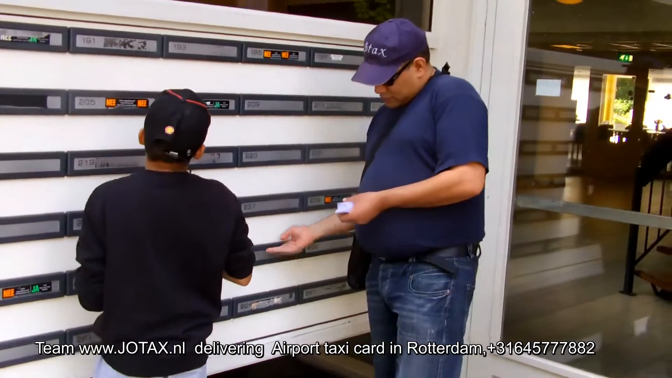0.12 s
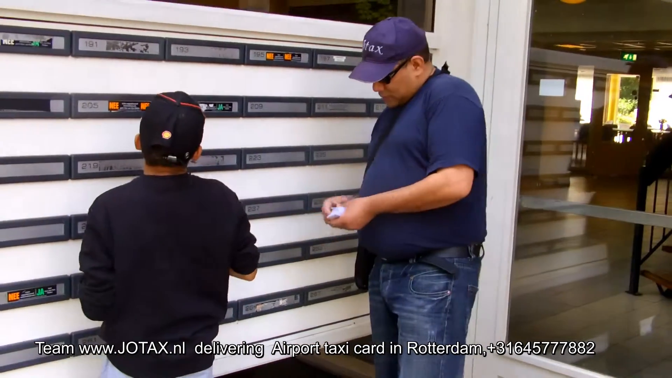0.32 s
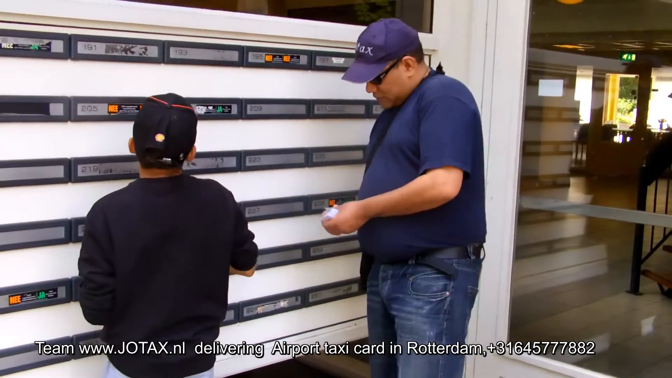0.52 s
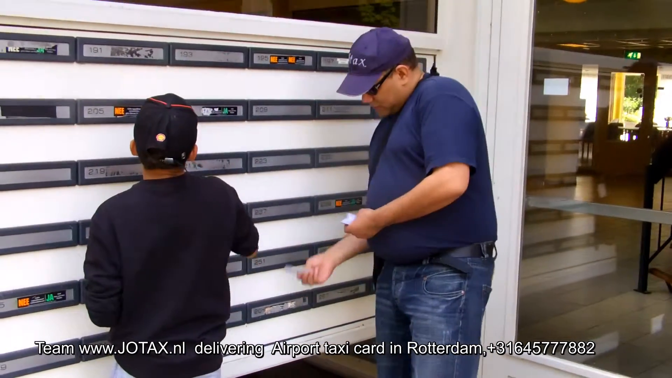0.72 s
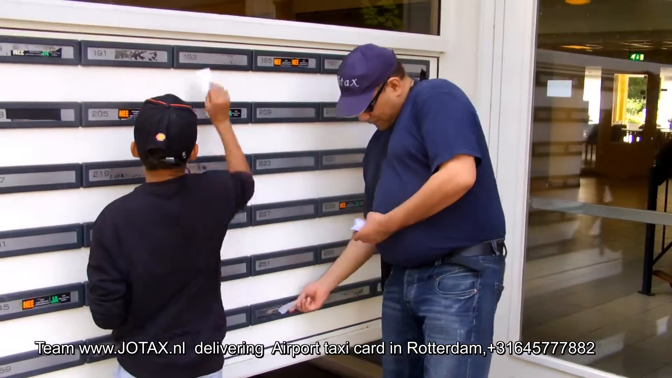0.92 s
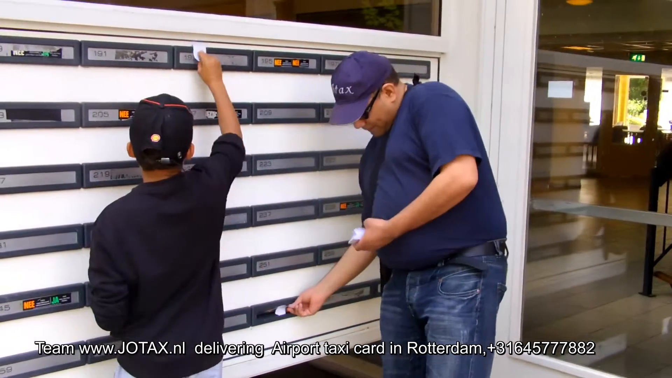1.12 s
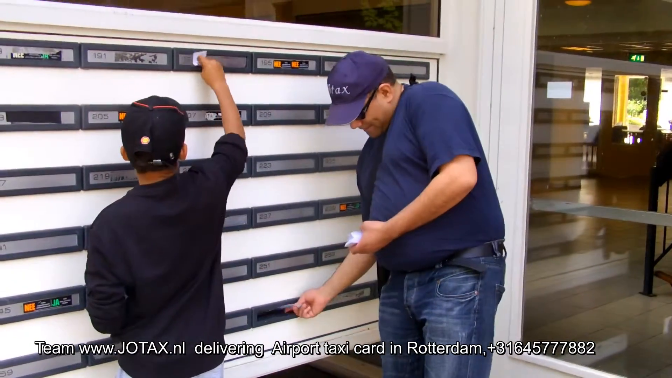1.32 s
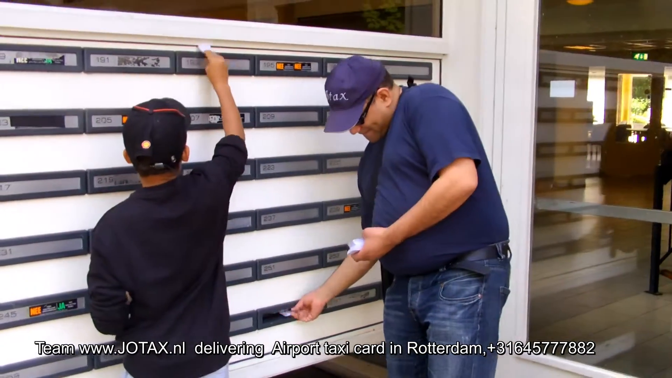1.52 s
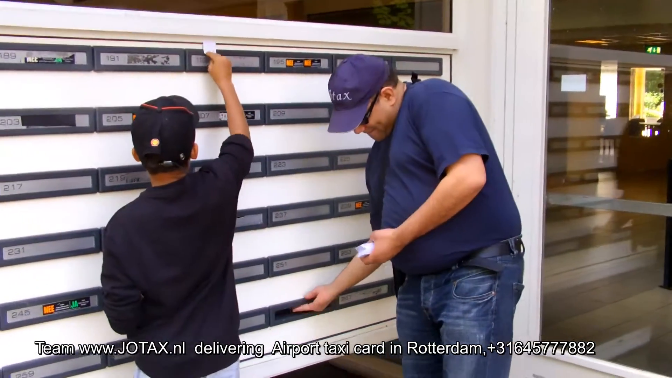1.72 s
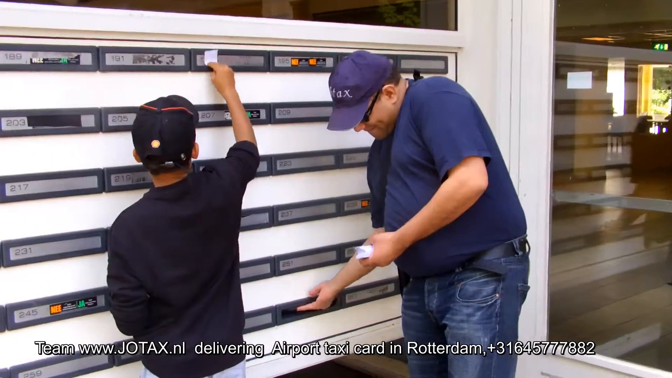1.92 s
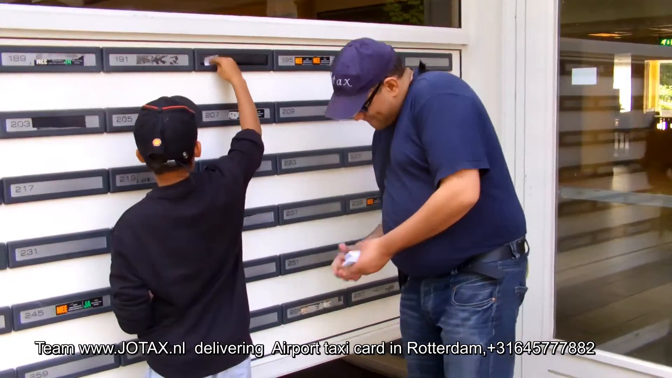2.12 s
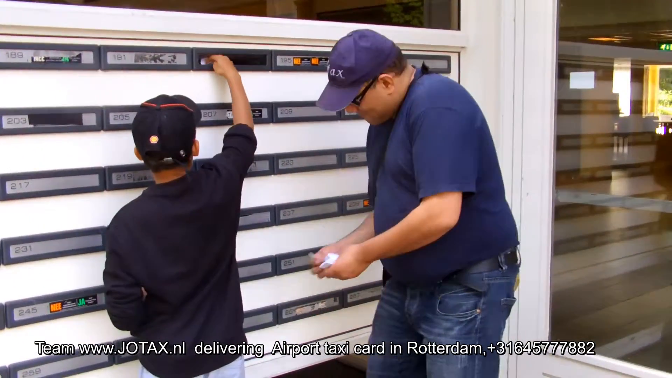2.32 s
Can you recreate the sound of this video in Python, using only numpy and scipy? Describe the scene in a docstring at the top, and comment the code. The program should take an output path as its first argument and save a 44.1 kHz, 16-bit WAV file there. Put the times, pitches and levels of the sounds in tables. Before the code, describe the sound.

Metal mailbox flaps clack shut four times, with cards scuffing through the slots between.

```python
"""An entrance hall, a stereo microphone one step from a wall of mailboxes. Distant traffic and a faint
fan hum lie under it all. Cards scuff in a slot; at 0.2 s a low sprung metal flap snaps shut and bounces
on its frame, then a high one at 0.56 s. Each blow chatters for a few ms and rings the flap and the box
behind it, and the hall answers softly. More cards scuff and lifted flaps clink, until another high flap
slams at 1.5 s and another low one at 2.0 s."""
import sys
import numpy as np
from scipy import signal
from scipy.fft import rfft, irfft
from scipy.io import wavfile
from scipy.ndimage import uniform_filter1d

SR = 44100
rng = np.random.default_rng(int(sys.argv[2]) if len(sys.argv) > 2 else 0)


def unload_wav(signal):
    """Save mono or channel-first audio to the path in sys.argv[1] as 16-bit WAV at rate SR, clipped to [-1, 1]."""
    wavfile.write(
        sys.argv[1],
        SR,
        np.round(np.clip(np.atleast_2d(signal).T, -1, 1) * 32767).astype(np.int16),
    )


N = 103635

# distant traffic, its mid spectrum and its side relative to the mid: f/Hz, level/dB
TRAFFIC_MID = [(18, -37.5), (30, -28.5), (221, -15.5), (287, -9.5), (404, -15), (437, -4), (473, -11.5),
               (760, -5), (1910, -15), (14800, -29), (16000, -40.5)]
TRAFFIC_SIDE = [(60, -33.5), (110, -18), (200, -22), (380, -15), (700, -15.5), (1290, -11.5), (2380, -8.5),
                (4400, -5.5), (8120, 2), (15000, 1)]
# partials of the fan: f/Hz, rms level/dB
FAN_PARTIALS = [(439, -72), (586, -74.5), (733, -77.5)]
# left over right at the microphone, for near sounds: f/Hz, level/dB
MIC_BALANCE = [(200, -1), (2400, 0.5), (4800, 0), (8000, -4), (12000, 6.5), (15000, 5.5)]
# phase by which the left port leads, before lead_scale: f/Hz, phase/rad
MIC_PHASE = [(3500, 0.046), (5500, 0.59), (8000, 0.77), (12000, 0.86), (16000, 1)]
# cards and fingers at the slots, and a light flap tap at 1.81 s: t/s, peak level/dB, centre f/Hz,
# width/octaves, rise/ms, t60/s
SLOT_SCUFFS = [(0.142, -37.5, 4830, 6.2, 0.59, 0.16), (0.182, -33.5, 1960, 1.7, 6.6, 0.53),
               (.655, -42, 7850, 1.4, 1.1, 0.25), (.7, -50.5, 7060, 0.61, 4.4, 0.15),
               (0.928, -40, 2470, 5.6, 7.1, 0.18), (0.994, -39.5, 3970, 5.6, 4.6, 0.12),
               (1.062, -46.5, 7500, 0.26, 1.4, 0.038), (1.115, -39.5, 8000, 0.46, 3, 0.038),
               (1.125, -32.5, 6000, 3.5, 0.99, 0.041), (1.145, -26.5, 6000, 2.06, 0.17, 0.082),
               (1.151, -40, 10000, 1.9, 0.17, 0.023), (1.1613, -33.5, 7860, 3.6, 0.66, 0.13),
               (1.185, -37.5, 5730, 5.2, 0.8, 0.072), (1.233, -46, 6500, 0.69, 5, 0.059),
               (1.2877, -42.5, 7900, 0.34, 3.2, 0.067), (1.306, -38, 9300, 2, 1.2, 0.21),
               (1.335, -39, 9250, 3.2, 24, 0.26), (1.3648, -41, 7000, 1.6, 0.86, 0.028),
               (1.3693, -26.5, 8050, 3.6, 0.89, 0.047), (1.3746, -23, 3700, 0.92, 0.38, 0.081),
               (1.3991, -33.5, 4300, 4.3, 0.52, 0.036), (1.66, -43, 5970, 2.4, 3.1, 0.22),
               (1.739, -46, 2020, 0.27, 3.8, 0.056), (1.623, -42.5, 4000, 2, 1, 0.13),
               (1.8113, -25.5, 7100, 1.22, .4, 0.14), (1.816, -33.5, 2040, 0.48, 0.32, 0.13),
               (1.8936, -37.5, 6160, 4.5, 1.2, 0.17), (1.942, -45, 5800, 2.4, 2.4, 0.033),
               (1.9467, -37, 2530, 1.8, 0.31, 0.18), (2.0, -33, 9000, 2.3, 37, .4),
               (2.2393, -45, 7000, 1.5, 1.7, 0.71), (2.335, -42.5, 12100, 0.5, 2.3, 0.12)]
# flaps being lifted: t/s, peak level/dB, t60/s
HINGE_CLINKS = [(1.0002, -53, 0.067), (1.126, -46, 0.11), (1.146, -48, 0.085), (1.3755, -41.5, 0.099),
                (1.948, -46, 0.085), (.933, -60.5, 0.039)]
# modes of the boxes behind the flaps: f/Hz, first box level/dB, second box level/dB, t60/s
LOW_BOX_MODES = [(234, -8, -2.5, 0.12), (282, -14.5, -15, 0.52), (636.7, 3, 1, 0.08),
                 (1030, -5.5, 3.5, 0.063), (1527, 2, 3, 0.07), (2065, 5.5, 7, 0.071), (140, -8, -12, .05)]
HIGH_BOX_MODES = [(217, -3.5, -2, 0.062), (281, -6, -12, 0.31), (640, 0, 5.5, 0.1), (806, -22, 2, 0.068),
                  (990, 6, -22, 0.098), (1343, 1, 4.5, 0.094), (1623, 8, 6.5, 0.053)]
# modes of the two low and two high flaps: f/Hz, first flap level/dB, second flap level/dB, t60/s
LOW_FLAP_MODES = [(3170, -6.5, -4.5, 0.16), (3402, -8, -9.5, 0.13), (3903, -4.5, -13, 0.11),
                  (4680, -6.5, -24, 0.11), (5190, -7.5, -14, .1), (5930, -10.5, -2.5, 0.13),
                  (6765, 5.5, -10, 0.076), (7360, 4, 1, 0.12), (7923, 6.5, 2.5, 0.09),
                  (9030, -4, 6.5, 0.083), (10595, 14, 11, 0.033), (11420, 6, -0.5, .1),
                  (12490, 4.5, 10, 0.037)]
HIGH_FLAP_MODES = [(2774, -12, -7.5, 0.26), (3090, -2, -4, 0.14), (3440, 2, -7, 0.15),
                   (3830, -14, -2.5, 0.08), (5050, -19, -1.5, 0.033), (5730, -6, 5, 0.033),
                   (6720, -1, -5.5, 0.071), (8820, 5, 8.5, 0.1), (10450, 0, 6, 0.069), (12380, 4, 9, 0.039),
                   (11850, 2.5, 5, 0.06)]
# spectrum of the plates' dense wash: f/Hz, relative level/dB
LOW_FLAP_WASH = [(59, -55), (100, -19.5), (239, -21.5), (461, -21), (621, -14), (1310, -12.5), (1580, -15),
                 (5650, -6.5), (10700, -1.5), (14700, -6.5), (16000, -31.5)]
HIGH_FLAP_WASH = [(59, -71), (100, -44), (260, -6), (442, -12.5), (648, -3), (1170, -7.5), (3250, -8),
                  (4020, -6), (11900, -2), (15000, -10), (16000, -30)]
# blows and bounces on the frames: t/s, peak level/dB, thud trim/dB, tail trim/dB, chatter/ms, wash t60/s
LOW_FLAP_BLOWS = [(.2024, 3.5, -34, -27.5, 1.8, 0.064), (.2048, -2.5, -36, -12, 1.2, .12),
                  (.2083, -4, -34.5, -17, 3.5, 0.076), (.2277, -20, -32.5, -24, .5, .1),
                  (.2374, -12.5, -42.5, -13, 5, .12), (.2415, -8, -37.5, -9, 4, 0.13),
                  (.264, -19, -28, -4, 3, .1), (.274, -37, -30, -11, 3, 0.071),
                  (2.0362, 3.5, -36, -20, 1.35, .14), (2.0386, -1, -32, -16, 3.5, 0.16),
                  (2.0617, -19, -41, -7, 1, 0.14), (2.0682, -9, -36, -13.5, 2, 0.11),
                  (2.07, -15, -36, -15, 1, 0.083), (2.0725, -12, -31, -6, 4, 0.15),
                  (2.087, -22, -22.5, -8, 3, 0.064)]
HIGH_FLAP_BLOWS = [(.5572, -15.5, -19, -11, 6.1, 0.07), (.5608, -13, -25.5, -9, 1.7, 0.15),
                   (.5704, -22, -18, -2, 3.2, 0.21), (.594, -40, -4.5, 2.5, 3, 0.081),
                   (1.4921, -8, -28.5, -9.5, 2.9, 0.075), (1.4975, -11.5, -29, -5, 4.6, 0.16),
                   (1.5104, -20.5, -22, 3, 1.4, .1), (1.5184, -20, -27, -3, 12, 0.077),
                   (1.532, -30.5, -22, -15, 3, 0.053)]

TRAFFIC_DB, SWELL_DB, FLICKER_DB = -57, 0.96, 1.84
HALL_DB, HALL_T60_S, HALL_DULL_HZ = -23.5, 0.93, 6960
SCATTER_DB, SCATTER_MS, SCATTER_TOP_HZ = -30.5, 3.6, 1500
RING_DB, WASH_DB, BOX_DB = 1.5, 4.5, 3
SECOND_FLAPS_AFTER_S = 1


def undb(db):
    return 10 ** (np.asarray(db) / 20)


def curve(table, hz):
    """A table read on a log-frequency axis."""
    table = np.array(table, float)
    return np.interp(np.log(np.maximum(hz, 1)), np.log(table[:, 0]), table[:, 1])


def colour(x, gain):
    """Filter by a gain law of frequency."""
    return irfft(rfft(x) * gain(np.arange(len(x) // 2 + 1) * SR / len(x)), len(x))


def fade(t, t60):
    return np.exp(-np.log(1000) * t / t60)


def rise(t, seconds):
    return 1 - np.exp(-t / seconds)


def unit_rms(x):
    return x / np.sqrt(np.mean(x ** 2))


def place(out, start_s, peak_db, x):
    i = int(start_s * SR)
    x = x[:N - i] * undb(peak_db) / np.max(np.abs(x))
    out[i:i + len(x)] += x


def drift(rate_hz):
    """Slow random wander, spread 1."""
    hold = int(SR / rate_hz)
    steps = np.repeat(rng.standard_normal(N // hold + 1), hold)
    smooth = uniform_filter1d(uniform_filter1d(steps, hold), hold)[:N]
    return unit_rms(smooth - smooth.mean())


def ring(modes, t, flutter_hz, cluster_gain=1.36):
    """Decaying modes; a cluster of close partials around each makes it flutter."""
    out = 0
    for hz, db, t60 in modes:
        cluster = colour(rng.standard_normal(len(t)), lambda f: 1 / (1 + ((f - hz) / flutter_hz) ** 2))
        tone = np.sqrt(2) * np.sin(2 * np.pi * (hz * t + rng.random()))
        out = out + undb(db) * fade(t, t60) * (tone + cluster_gain * unit_rms(cluster))
    return out


def traffic():
    """Far off, outside the hall: octave bands of noise that swell together and flicker alone."""
    mid = colour(rng.standard_normal(N), lambda hz: undb(curve(TRAFFIC_MID, hz)))
    side = colour(rng.standard_normal(N),
                  lambda hz: undb(curve(TRAFFIC_MID, hz) + curve(TRAFFIC_SIDE, hz)))
    out, swell = 0, drift(rate_hz=1.93)
    for centre_hz in 2 ** np.arange(5, 15):
        octave = lambda hz: np.maximum(1 - np.abs(np.log2((hz + 1) / centre_hz)), 0)
        band = np.array([colour(mid + side, octave), colour(mid - side, octave)])
        out = out + undb(SWELL_DB * swell + FLICKER_DB * drift(rate_hz=9.6)) * band
    return undb(TRAFFIC_DB) * out / np.std(out.mean(axis=0))


def fan_hum(waver_db=0.73):
    """A faint fan, dead centre: three partials, each wavering in level."""
    t = np.arange(N) / SR
    return sum(np.sqrt(2) * undb(db + waver_db * drift(rate_hz=18)) * np.sin(2 * np.pi * hz * t)
               for hz, db in FAN_PARTIALS)


def hall(x):
    """The entrance hall returns a dull, diffuse tail, a little different at each side."""
    t = np.arange(SR) / SR
    mid, side = rng.standard_normal((2, SR)) * fade(t, HALL_T60_S) * rise(t, 0.011)
    tails = np.array([mid + 0.81 * side, mid - 0.57 * side])
    tails /= np.linalg.norm(tails[0])
    dull = colour(x, lambda hz: 1 / (1 + (hz / HALL_DULL_HZ) ** 2))
    return undb(HALL_DB) * signal.fftconvolve(dull[None], tails, axes=1)[:, :N]


def microphone(x, lead_scale):
    """A step away, the two microphone ports hear a sound with their own level, lead and early scatter."""
    left = lambda hz: undb(curve(MIC_BALANCE, hz) / 2) * np.exp(.5j * lead_scale * curve(MIC_PHASE, hz))
    right = lambda hz: 1 / left(hz)
    t = np.arange(1000) / SR
    scatter = rng.standard_normal(len(t)) * np.exp(-t * 1000 / SCATTER_MS)
    lows = colour(x, lambda hz: 1 / (1 + (hz / SCATTER_TOP_HZ) ** 2))
    side = undb(SCATTER_DB) * signal.fftconvolve(lows, scatter / np.linalg.norm(scatter))[:N]
    return np.array([colour(x, left) + side, colour(x, right) - side])


def card_scuffs(dull_hz=14230):
    """Card brushes the metal of a slot, or a flap taps it lightly: grainy noise in a band around its brightest
    pitch."""
    out, t = np.zeros(N), np.arange(SR // 4) / SR
    for start_s, db, centre_hz, octaves, rise_ms, t60 in SLOT_SCUFFS:
        noise, roughness = rng.standard_normal((2, len(t)))
        grains = noise * undb(11.75 * uniform_filter1d(roughness, size=16))
        band = lambda hz: np.exp(-(np.log2((hz + 1) / centre_hz) / max(octaves, .3)) ** 2 / 2)
        brush = colour(grains, lambda hz: band(hz) / (1 + (hz / dull_hz) ** 6))
        place(out, start_s, db, brush * rise(t, rise_ms / 1000) * fade(t, t60))
    return out


def hinge_clinks(hz=3420):
    """A lifted flap touches its hinge and rings in one band."""
    out, t = np.zeros(N), np.arange(1 << 13) / SR
    for start_s, db, t60 in HINGE_CLINKS:
        place(out, start_s, db, ring([(hz, 0, t60)], t, flutter_hz=150) * rise(t, 0.00058))
    return out


def struck(modes, start_s):
    """The modes at the levels of the first mailbox or of the second."""
    return [(hz, second_db if start_s > SECOND_FLAPS_AFTER_S else first_db, t60)
            for hz, first_db, second_db, t60 in modes]


def box_thud(modes, t, jitter, vary_db=1.04):
    """The hollow box rings behind the flap, its modes a little different in level at each blow."""
    varied = [(hz, db + vary_db * nudge, t60) for (hz, db, t60), nudge in zip(modes, jitter)]
    return ring(varied, t, flutter_hz=73, cluster_gain=1.8) * rise(t, 0.0043)


def flaps(blows, flap_modes, wash_spectrum, box_modes, thin_below_hz=1890):
    """Each sprung flap hits its frame: tiny contacts set off its modes and wash; its box thuds below."""
    out, t = np.zeros(N), np.arange(1 << 14) / SR
    plate = lambda x: unit_rms(colour(x, lambda hz: undb(curve(wash_spectrum, hz))))
    for start_s, db, thud_db, tail_db, chatter_ms, wash_t60 in blows:
        noise, jitter, wash_noise = rng.standard_normal((3, len(t)))
        ringing = ring(struck(flap_modes, start_s), t, flutter_hz=188)
        ringing /= np.std(ringing[:400])  # unit level over the first 9 ms
        spikes = noise * undb(8.8 * np.abs(jitter))
        contacts = colour(spikes, lambda hz: hz / np.hypot(hz, thin_below_hz))
        chatter = (plate(contacts) + 0.76 * ringing) * np.exp(-t * 1000 / chatter_ms)
        wash = plate(wash_noise) * fade(t, wash_t60)
        tail = undb(RING_DB) * ringing + undb(WASH_DB) * wash
        place(out, start_s, db, (chatter + undb(tail_db) * tail) * rise(t, 0.00016))
        thud = box_thud(struck(box_modes, start_s), t, jitter)
        place(out, start_s, db + thud_db + BOX_DB, thud)
    return out


def scene():
    """The mailboxes close to the microphone; the hall, traffic and fan behind them."""
    low = flaps(LOW_FLAP_BLOWS, LOW_FLAP_MODES, LOW_FLAP_WASH, LOW_BOX_MODES)
    handling = card_scuffs() + hinge_clinks()
    high = flaps(HIGH_FLAP_BLOWS, HIGH_FLAP_MODES, HIGH_FLAP_WASH, HIGH_BOX_MODES)
    near = microphone(low + handling, lead_scale=1) + microphone(high, lead_scale=1.76)
    return near + hall(low + high + handling) + traffic() + fan_hum()


def record(dry, top_hz=15400):
    """The loudest peaks clip just under full scale; the top is cut steeply."""
    lowpass = signal.ellip(10, .2, 70, top_hz, fs=SR, output="sos")
    return signal.sosfilt(lowpass, np.clip(dry, -.95, .95))


dry = scene()
out = record(dry)
unload_wav(out)
```